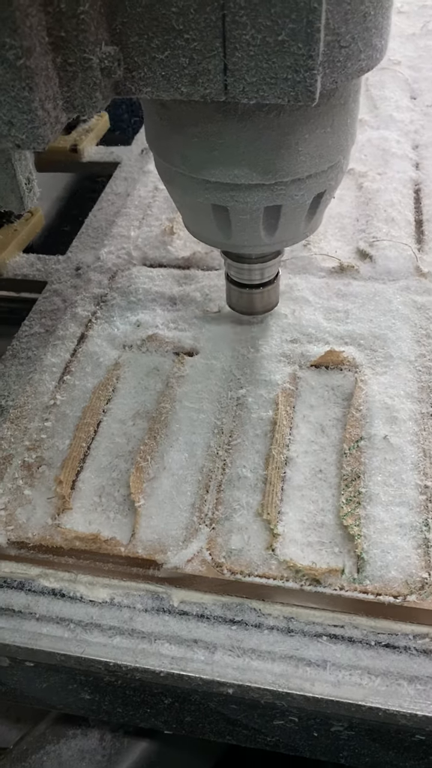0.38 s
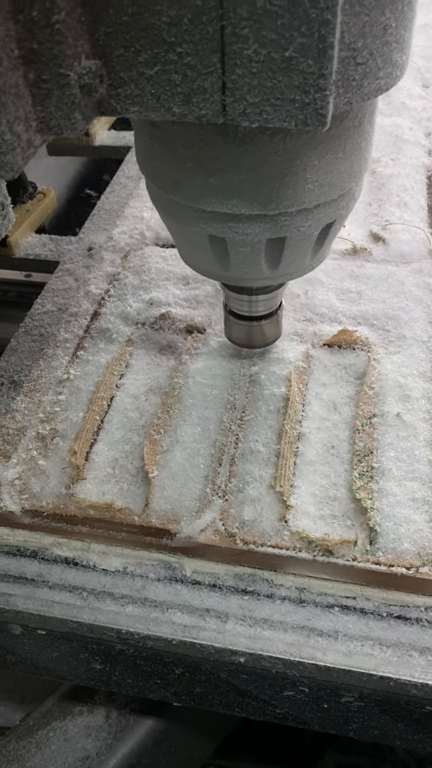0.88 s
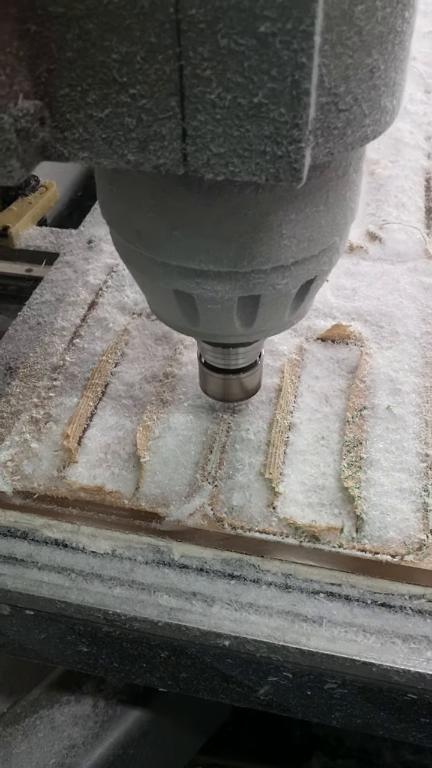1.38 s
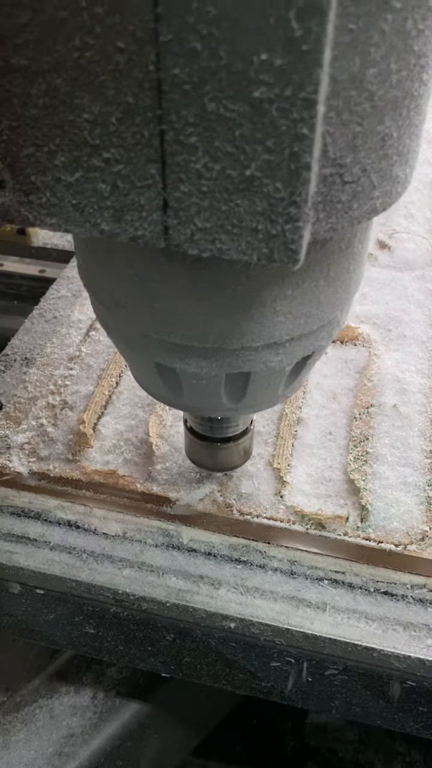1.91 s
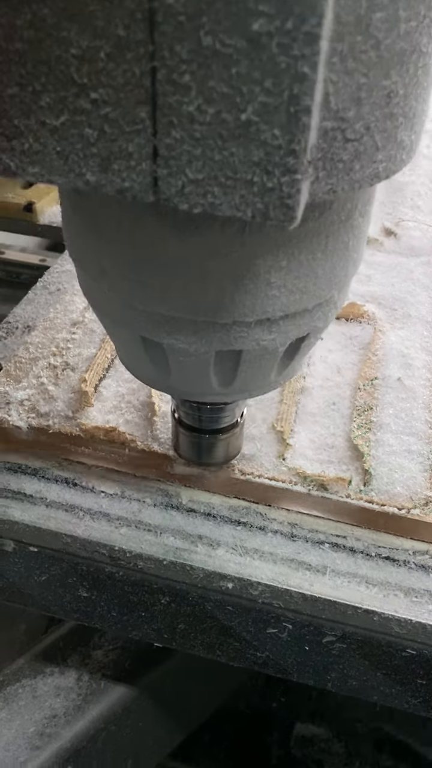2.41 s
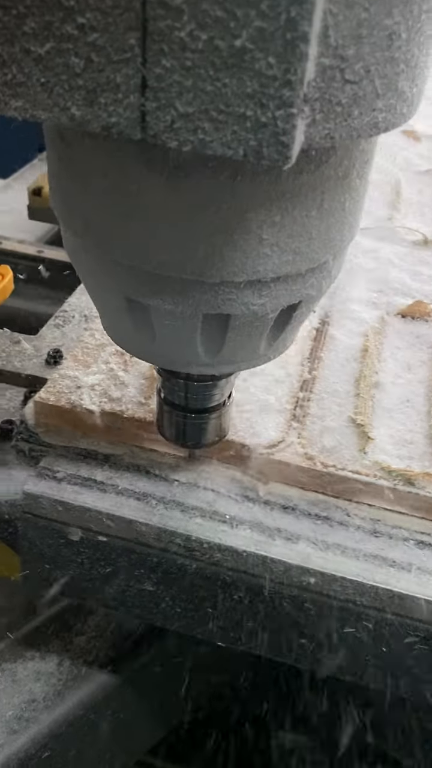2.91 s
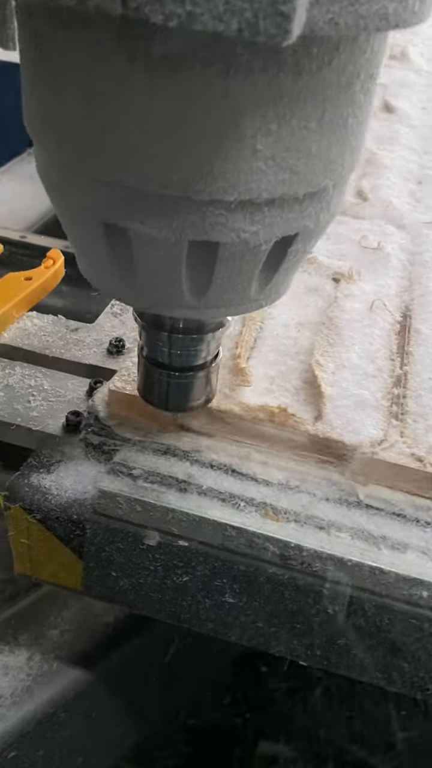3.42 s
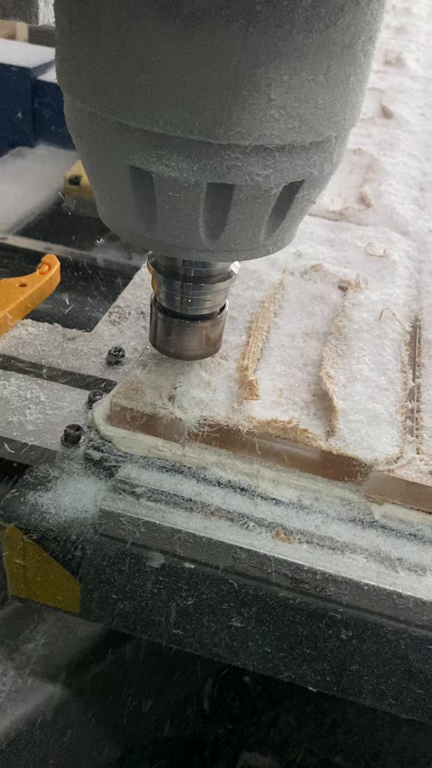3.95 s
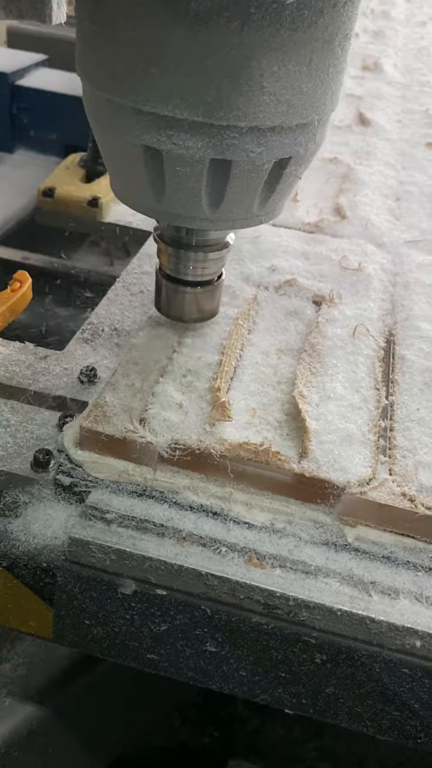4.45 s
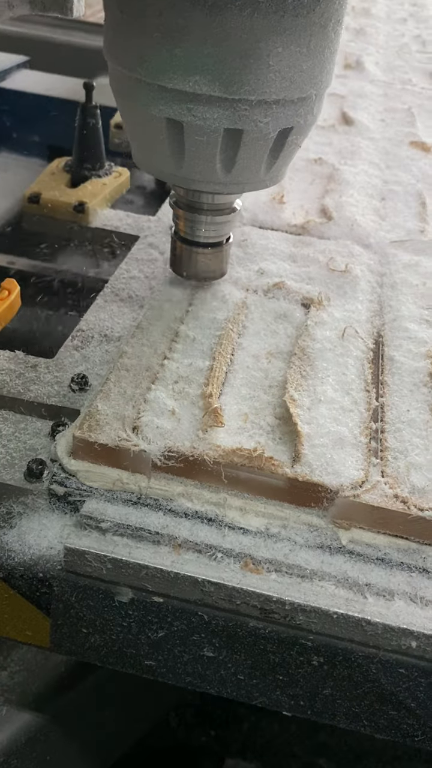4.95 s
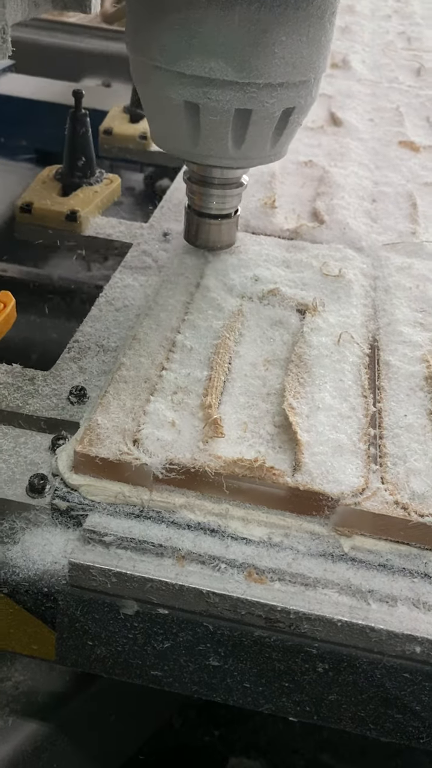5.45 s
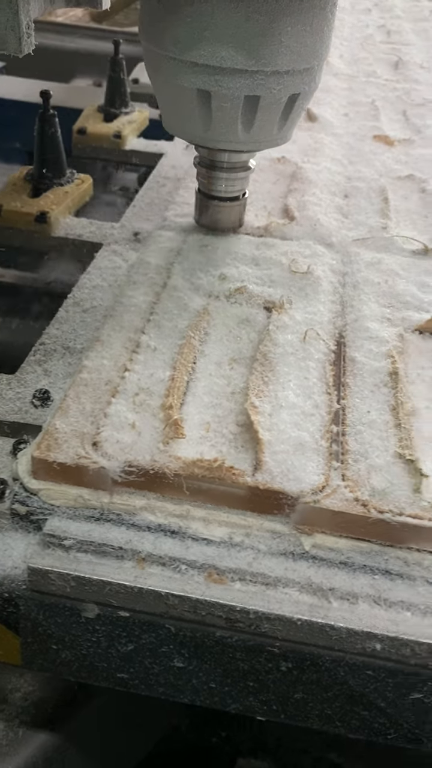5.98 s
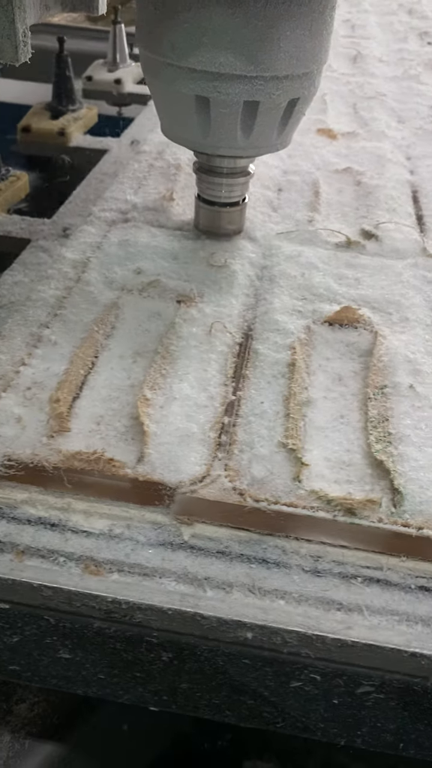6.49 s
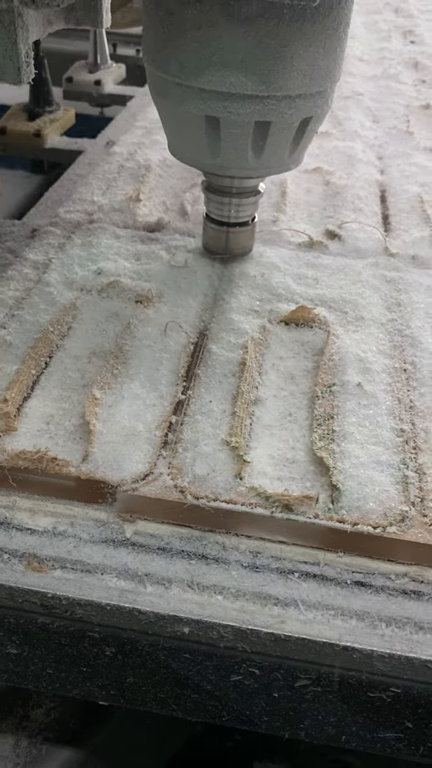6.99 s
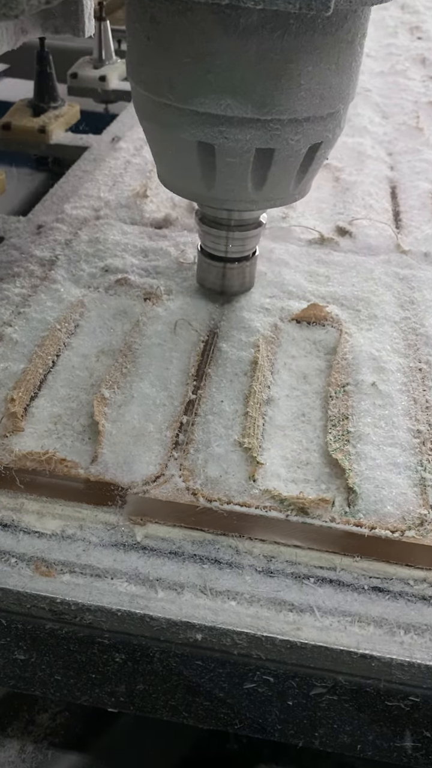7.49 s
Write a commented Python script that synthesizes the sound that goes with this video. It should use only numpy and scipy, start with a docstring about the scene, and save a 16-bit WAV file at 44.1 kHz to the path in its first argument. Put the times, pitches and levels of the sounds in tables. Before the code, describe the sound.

Sharp airy milling hiss and a low spindle hum rise and fade, with brief crunches near the middle and dull machine rumble behind.

```python
"""A router spindle near 24000 rpm sings its shaft orders as it drives a single-flute cutter through plastic.
The orders are sines that swell and dip; each turn of the flute tears a chip off with a puff of filtered hiss.
The clamped sheet buzzes as shaped noise, splinters crunch as runs of random snaps, and a blower rumbles
behind with wavering tones. Two microphone ports a few centimetres apart pick it all up."""
import sys
import numpy as np
from scipy import signal
from scipy.fft import rfft, irfft
from scipy.io import wavfile
from scipy.ndimage import uniform_filter1d

SR = 44100
rng = np.random.default_rng(int(sys.argv[2]) if len(sys.argv) > 2 else 0)


def nominal_scale(level):
    """Amplitude ratio for a level in decibels (scalar or array-like)."""
    x = np.asarray(level, float) / 20
    return 10 ** x


def store_wav(level_fs):
    """Save 16-bit WAV to argv[1]."""
    pcm = np.round(np.clip(np.atleast_2d(level_fs), -1, 1) * 32767)
    wavfile.write(sys.argv[1], SR, pcm.T.astype(np.int16))


N = 336042

SHAFT_HZ = 398.7
EDGE_HZ = 15760  # upper band limit
HZ = np.fft.rfftfreq(512, 1 / SR)
FRAMES = np.arange(N // 128 + 5) * 128 / SR  # frame times in seconds
T = np.arange(N) / SR
# Phase between the ports. Each row: frequency in Hz, lead of the left port in radians.
PORT_LEAD_RAD = [(350, 0), (1200, .2), (2700, .6), (4300, .5), (5400, .8), (6900, 2.8), (7400, 3.14),
                 (10380, 6.28), (13600, 9.42), (16000, 11.9)]


def evened(x):
    """Scales to rms 1."""
    return x / np.sqrt(np.mean(x ** 2) + 1e-20)


def read(points, hz):
    """Reads a (Hz, value) table on a log-frequency axis."""
    f, value = np.transpose(points)
    return np.interp(np.log(hz + 1), np.log(f + 1), value)


def columns(rows, t):
    """Reads every column of a time table at the moments t."""
    s, *values = np.transpose(rows)
    return [np.interp(t, s, v) for v in values]


def port_lead(hz):
    """Phase in radians by which the left port leads the right."""
    return np.interp(hz, *np.transpose(PORT_LEAD_RAD))


def plateau(start, end, edge):
    """Rises towards 1 around start and falls back around end, each ramp lasting edge seconds."""
    return np.clip(np.minimum(FRAMES - start, end - FRAMES) / edge + .5, 0, 1)


def patches(bins, frames):
    """Random time-frequency field of rms 1, smoothed twice over so many bins and frames."""
    field = rng.standard_normal((len(FRAMES), len(HZ))).T
    for _ in range(2):
        field = uniform_filter1d(field, bins, 0)
        field = uniform_filter1d(field, frames, 1)
    return evened(field)


def wander(frames, count=2):
    """Slow random drift of rms 1 in count rows, smoothed twice over so many frames."""
    slow = rng.standard_normal((count, len(FRAMES)))
    for _ in range(2):
        slow = uniform_filter1d(slow, frames, 1)
    return np.array([np.interp(T, FRAMES, row) for row in evened(slow)])


def port_noise(db_per_hz, size=512):
    """Noise at both ports from a level field: partly alike, the left port leading by its phase."""
    # Likeness of the ports. Each row: frequency in Hz, left-right likeness from 0 to 1.
    port_likeness = [(60, 1), (220, 1), (450, 0.9), (900, 0.088), (2500, 0.39), (3400, 0.041), (4500, 0.31),
                     (5800, 0.67), (7000, 1), (9000, 1), (10500, .998), (12500, 1), (14500, 0.96),
                     (16000, .97)]
    # Balance of the ports. Each row: frequency in Hz, left over right in dB.
    port_balance = [(250, 0), (400, 3), (800, 2), (1200, 0)]
    hz = np.fft.rfftfreq(size, 1 / SR)
    a, b, c, d = rng.standard_normal((db_per_hz.shape[1], len(hz), 4)).T
    same = np.clip(read(port_likeness, hz), 0, 1)[:, None]
    left = a + 1j * b
    shared = same * left * np.exp(-1j * port_lead(hz)[:, None])
    right = shared + np.sqrt(1 - same ** 2) * (c + 1j * d)
    side = nominal_scale(read(port_balance, hz) / 2)[:, None]
    scale = np.sqrt(3 * SR / size / 2)  # makes the level a density per Hz
    z = np.array([left * side, right / side]) * nominal_scale(db_per_hz) * scale
    return signal.istft(z, nperseg=size, noverlap=size * 3 // 4)[1][:, :N]


def blower(waver_db=2.5, waver_rad=0.72):
    """Low rumble of the extraction blower as shaped noise, with wavering sines of its motor and blades."""
    # Rumble spectrum. Each row: frequency in Hz, relative density in dB per Hz.
    rumble_shape = [(25, -49), (38, -28), (48, -9.5), (75, -8.5), (135, -0.5), (190, 2), (260, -6),
                    (340, -7.5), (470, -14), (700, -12.5), (900, -15), (1300, -21.5), (2000, -27)]
    # Rumble loudness. Each row: time in seconds, whole-band level in dB.
    rumble_level = [(0.0, -28), (1.0, -29), (1.55, -30), (2.6, -28), (4.92, -33), (5.35, -31.5),
                    (6.1, -33.5), (6.71, -29), (6.98, -31.5), (7.1, -30), (7.62, -29.5)]
    # Motor and blade tones. Each row: frequency in Hz, level in dB about which it wavers.
    motor_tones = [(49.8, -50), (99, -47), (137, -46), (197.8, -40), (297.4, -47), (375.5, -51),
                   (592.2, -49), (749.6, -52)]
    hz = np.fft.rfftfreq(8192, 1 / SR)
    t = np.arange(N // 2048 + 5) * 2048 / SR
    power = nominal_scale(read(rumble_shape, hz)) ** 2
    density = power / power.sum() / hz[1]
    field = columns(rumble_level, t)[0] + 10 * np.log10(density)[:, None]
    out = port_noise(field, size=8192)
    for tone_hz, db in motor_tones:
        drift, phase = wander(25)
        angle = 2 * np.pi * (tone_hz * T + rng.random()) + waver_rad * phase
        out += np.sqrt(2) * nominal_scale(db + waver_db * drift) * np.sin(angle)
    return out


def sheet(patchy_db=2.0):
    """The clamped sheet buzzes under the cutter: broad shaped noise with slow patches."""
    # Buzz loudness. Each row: time in seconds, level in dB per Hz before the spectrum is added.
    buzz_level = [(0, -65.5), (.1, -70), (.4, -75), (1.05, -77), (1.6, -71), (2.03, -73), (2.11, -74),
                  (2.35, -75), (2.7, -69), (3.4, -74), (3.6, -80.5), (4.06, -74.5), (4.43, -79),
                  (5.12, -73.5), (5.55, -78.5), (5.9, -75), (6.1, -77), (6.8, -74.5), (7.62, -72.5)]
    # Buzz spectrum. Each row: frequency in Hz, offset in dB.
    buzz_shape = [(500, -29), (900, -3), (1500, -2.5), (2000, -3.5), (2700, 0.5), (3600, -5), (4600, -4),
                  (6500, -14.5)]
    field = columns(buzz_level, FRAMES)[0] + read(buzz_shape, HZ)[:, None]
    return port_noise(field + patchy_db * patches(bins=3, frames=25))


def crunch(grains_per_s=2500., spread_db=3.):
    """Splinters snap where the cutter meets fresh material: irregular filtered clicks, a fast rise and a fade."""
    # Gritty rasps. Each row: start in seconds, length in seconds, level in dB ahead of the fade,
    # centre in Hz, spread in octaves.
    rasps = [(2.149, 0.11, -27, 2600, 1.65), (2.64, 0.11, -30, 170, 1.3), (2.652, .11, -29, 700, 1.4),
             (2.798, 0.91, -42.5, 3060, 0.074)]
    out = np.zeros((2, N))
    for s, length, db, centre_hz, octaves in rasps:
        t = np.arange(round(length * SR)) / SR
        struck = rng.random(len(t)) < grains_per_s / SR
        size = nominal_scale(spread_db * rng.standard_normal(len(t)))
        snaps = struck * size * rng.choice([-1, 1], len(t))
        snaps = snaps + 0.031 * rng.standard_normal((2, len(t)))  # faint noise, separate at each port
        hz = np.fft.rfftfreq(len(t), 1 / SR)
        lag = np.array([0 * hz, port_lead(hz)])
        body = np.exp(-.5 * (np.log2((hz + 1) / centre_hz) / octaves) ** 2 - 1j * lag)
        rasp = evened(irfft(rfft(snaps) * body, len(t)))
        fade = np.minimum(t / 0.018, 1) * np.sqrt(1 - t / length)
        out[:, round(s * SR):][:, :len(t)] += nominal_scale(db) * fade * rasp
    return out


def bites(steady, length, spread_db):
    """Envelope of one bite per turn over a steady floor; length in turns, each chip of its own size."""
    turns = SHAFT_HZ * T
    sizes = nominal_scale(spread_db * rng.standard_normal(int(turns[-1]) + 2))
    puff = np.exp(-.5 * ((turns % 1 - .5) / length) ** 2)
    return evened(steady + sizes[turns.astype(int)] * puff)


def chips(ring_width=0.037, patchy_db=2.0, ripple_db=1.5, flicker_db=0.5):
    """Tearing hiss of the chips, coloured by the groove's ring and the table's echo, puffed once a turn."""
    # The cut. Each row: time in seconds, base hiss level in dB per Hz,
    # dull and bright hiss against the middle in dB ahead of the band weights.
    cut = [(0.0, -65.5, -0.5, -6), (0.54, -64.5, 1, -4), (0.75, -66, 0.5, -3), (1.6, -67, -0.5, 2),
           (1.95, -64, -4, -6.5), (2.37, -67, -1, -9.5), (2.55, -62, -8.5, -6.5), (3.15, -61.5, -7, -7),
           (3.4, -59, -11.5, -11), (3.5, -59, -14, -3), (3.62, -65, -2.5, 1.5), (4.06, -61.5, -8, 0),
           (4.57, -67, 0.5, 5.5), (4.9, -65, -1.5, 0.5), (5.52, -67.5, -4.5, 0), (5.8, -69, -7.5, -1),
           (5.88, -67.5, -6, -6.5), (6.79, -65.5, -7, -6.5), (6.9, -68.5, -2.5, -6), (7.4, -65, -2, -8),
           (7.62, -65, -1.5, -4)]
    # Centres of the dull, middle and bright hiss in Hz.
    hiss_bands = [6300, 10000, 13800]
    # Hiss spectrum. Each row: frequency in Hz, offset in dB.
    hiss_shape = [(2500, -27), (4500, -9.5), (5800, -1.5), (7500, -1.5), (9000, -2.5), (10500, -1.5),
                  (12500, 2), (14000, 2.5), (15500, 1)]
    # The cutter runs nearly free and the hiss drops. Each row: start and end in seconds, drop in dB.
    free_runs = [(2.028, 2.145, 10.5), (2.24, 2.335, 9), (5.923, 6.706, 6.5)]
    # The groove rings around the cutter. Each row: start and end in seconds, centre in Hz, dB over the hiss.
    groove_rings = [(0, 0.47, 11200, 4), (1.9, 2.67, 11600, 7), (2.5, 3.45, 9270, 6.5),
                    (3.5, 3.45, 9950, 3), (4.6, 5.85, 12000, 3), (7., 7.62, 9100, 2.5),
                    (3.45, 3.56, 15000, 7), (3, 5.8, 9800, -0.5), (3, 4.3, 6400, 2.5),
                    (4.5, 5.55, 5800, 3.5), (.35, .65, 9600, 4.5), (4, 4.16, 9600, 5.5), (6, 6.2, 11400, 7),
                    (5.95, 7.7, 11300, 2), (6.66, 7, 11400, 6)]
    # Echo off the table beside the sheet. Each row: time in seconds, delay in ms, strength from 0 to 1.
    table_echo = [(0, 0.78, 0.26), (2, 0.68, 0), (3.5, 0.81, .05), (3.7, .71, 0), (4, .735, 0.56),
                  (4.7, 0.76, 0.4), (5.3, 0.76, 0.7), (5.6, 0.79, 0.2), (5.8, .715, .05)]
    level_db, dull_db, bright_db = columns(cut, FRAMES)
    for start, end, drop_db in free_runs:
        level_db = level_db - drop_db * plateau(start, end, edge=0.039)
    field = level_db + read(hiss_shape, HZ)[:, None]

    log_hz = np.log(HZ + 1)
    dull = np.interp(log_hz, np.log(hiss_bands), [1, 0, 0])
    bright = np.interp(log_hz, np.log([*hiss_bands, EDGE_HZ]), [0.014, 0.049, 1, 0.63])
    field += dull[:, None] * dull_db + bright[:, None] * bright_db
    for start, end, ring_hz, ring_db in groove_rings:
        peak = np.exp(-.5 * ((HZ[:, None] - ring_hz) / (ring_width * ring_hz)) ** 2)
        field += ring_db * plateau(start, end, edge=0.084) * peak

    # direct sound and echo comb each other, more so in the treble where the table mirrors best
    delay_ms, echo = columns(table_echo, FRAMES)
    mirror = np.clip(echo, 0, .9) * np.clip(HZ[:, None] / hiss_bands[2], 0, 1)
    comb = 1 + mirror * np.exp(-2j * np.pi * HZ[:, None] * delay_ms / 1000)
    field += 10 * np.log10(abs(comb) ** 2 / (1 + mirror ** 2))

    # fainter echoes leave slow ripples; chips of uneven size make the whole hiss flicker together
    field += patchy_db * patches(bins=6, frames=40) + ripple_db * patches(bins=2, frames=70)
    field += flicker_db * evened(uniform_filter1d(rng.standard_normal(len(FRAMES)), 6))
    return port_noise(field) * bites(steady=1.5, length=.13, spread_db=2.5)


def order(multiple, db, waver_rad):
    """One multiple of the shaft speed at both ports, its phase drifting as the path length changes."""
    hz = multiple * SHAFT_HZ
    lag = np.array([[0], [port_lead(hz)]])
    angle = 2 * np.pi * (hz * T + rng.random()) - lag + waver_rad * wander(36)
    return np.sqrt(2) * nominal_scale(db) * np.sin(angle)


def shaft(hum_rad=0.41, faint_db=-34., unsteady=0.39, waver_db=0.94, waver_rad=0.43, swell_db=7.0, flat_top=2.43):
    """Clean sine orders of the shaft speed; each swells and dips as the head moves over the sheet."""
    # Hum at the shaft speed. Each row: time in seconds, level in dB ahead of any waver, left over right in dB.
    hum = [(0.0, -25.5, 7.5), (0.54, -28.5, 7.0), (0.9, -23, 5), (1.3, -21.0, 6.5), (1.5, -21.5, 5.5),
           (1.7, -28, 4.5), (2.0, -21, 1.5), (2.12, -28.5, 7), (2.2, -23.0, 4.5), (2.88, -24, 3),
           (3.38, -22.5, 1.5), (3.74, -27.5, 3.5), (3.96, -25, 0), (4.08, -37, 2), (4.16, -32.5, 6),
           (4.5, -31, 6), (4.6, -43.5, 17), (5.1, -41, 18), (5.3, -48, 25), (5.78, -45, 18),
           (5.92, -30.5, 3.5), (6.8, -28, 4.5), (7.02, -25.5, 4), (7.6, -30, 5.5)]
    # Quiet level of orders 2 to 8 between their swells, in dB.
    quiet_db = [-50.5, -53, -55.5, -59.5, -58.5, -54.5, -61]
    # One order whines up and fades as the head travels. Each row: peak time in seconds, multiple,
    # peak level over the quiet one in dB (added as amplitude), half length in seconds.
    swells = [(0.046, 4, -47, 0.051), (0.108, 2, -42.5, 0.14), (.13, 6, -59, 0.045), (0.38, 5, -49.5, 0.68),
              (0.5, 7, -57, 0.07), (0.6, 3, -47.5, 0.26), (0.63, 8, -58, 0.5), (.8, 2, -49, 0.25),
              (1.115, 6, -49.5, 0.44), (1.55, 7, -47, 0.29), (1.604, 5, -51, 0.09), (1.7, 2, -48, 0.098),
              (1.95, 7, -43, 0.15), (2.02, 2, -33, 0.0085), (2.051, 7, -27, 0.0093), (2.42, 6, -44.5, .05),
              (2.49, 3, -43, 0.091), (2.504, 4, -40, 0.14), (3.03, 6, -53, 0.29), (3.079, 5, -45.5, 0.24),
              (3.4, 4, -49.5, 0.27), (3.423, 3, -41.5, 0.043), (3.42, 7, -50, 0.33), (3.677, 6, -45, 0.06),
              (3.95, 6, -56, 0.08), (3.958, 3, -37, 0.13), (4.103, 2, -43.5, 0.24), (4.42, 4, -50.5, 0.24),
              (4.5, 3, -42, 0.3), (4.74, 5, -47, 0.6), (4.68, 6, -44.5, 0.24), (5.024, 6, -45.5, 0.074),
              (4.853, 2, -48, 0.15), (5.13, 8, -51, 0.26), (5.3, 7, -61, .25), (5.664, 2, -46, 0.07),
              (5.798, 4, -62, 0.036), (5.92, 2, -41, 0.057), (6.123, 4, -49.5, 0.3),
              (6.078, 6, -46.5, 0.24), (6.406, 3, -47, 0.34), (6.45, 8, -51, 0.23), (6.867, 7, -44, 0.034),
              (7., 6, -51, 0.26), (7.3, 2, -47, .1), (7.38, 5, -45, 0.23), (7.5, 3, -47, .25),
              (7.53, 4, -49, 0.14)]
    # Faint upper orders. Each row: multiple, mean level in dB.
    upper_orders = [(10, -61), (11, -63), (14, -63), (16, -64)]
    hum_db, pan_db = columns(hum, T)
    hum_db = hum_db + unsteady * np.maximum(faint_db - hum_db, 0) * wander(14)  # a faint hum wavers
    out = order(1, hum_db + np.array([[.5], [-.5]]) * pan_db, hum_rad)
    for k, floor_db in enumerate(quiet_db, 2):
        level = nominal_scale(floor_db) + np.zeros(len(FRAMES))
        for s, multiple, peak_db, half in swells:
            if multiple == k:
                level += nominal_scale(peak_db) * np.exp(-.5 * abs((FRAMES - s) / half) ** flat_top)
        db = np.interp(T, FRAMES, 20 * np.log10(level))
        out += order(k, db + waver_db * wander(30), waver_rad)
    for k, db in upper_orders:
        out += order(k, db + swell_db * wander(120, count=1), waver_rad)
    return out


def scene():
    """Spindle, cut and workshop together."""
    return shaft() + chips() + sheet() + crunch() + blower()


def band_limit(x):
    """A steep low-pass at the top of the band."""
    return signal.sosfilt(signal.butter(12, 17060, fs=SR, output="sos"), x)


def record(dry):
    """The recorder's band limit: a steep linear-phase low-pass."""
    edge = signal.firwin(511, EDGE_HZ, window=("kaiser", 9), fs=SR)
    mix = signal.oaconvolve(dry, edge[None], "same")
    return band_limit(mix)


dry = scene()
out = record(dry)
store_wav(out)
```